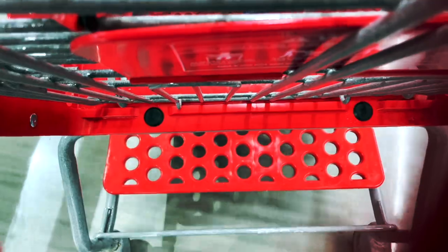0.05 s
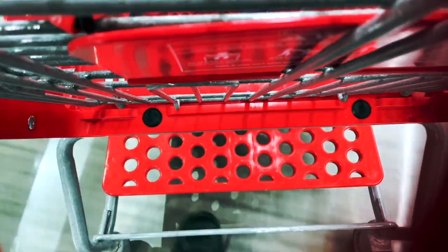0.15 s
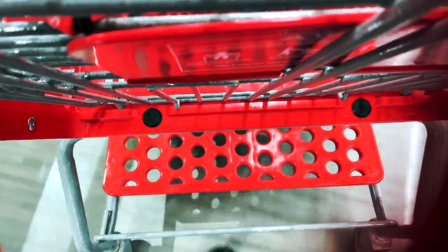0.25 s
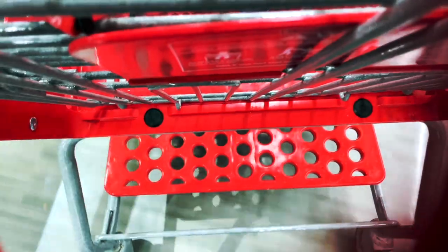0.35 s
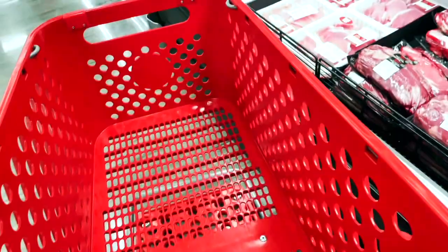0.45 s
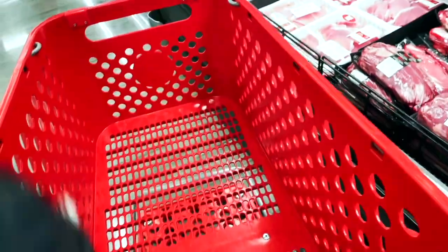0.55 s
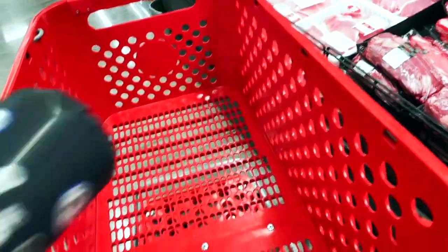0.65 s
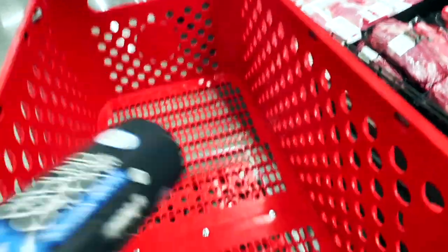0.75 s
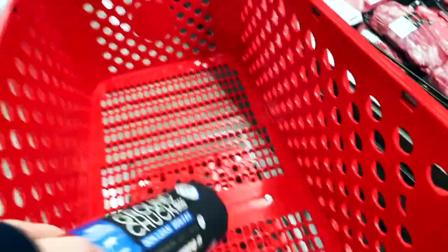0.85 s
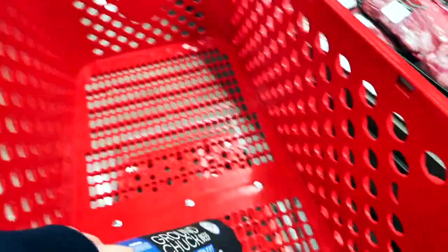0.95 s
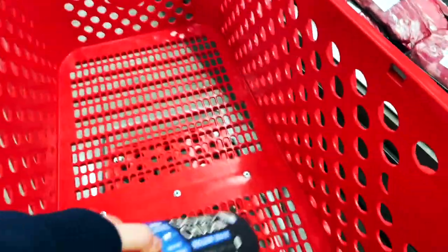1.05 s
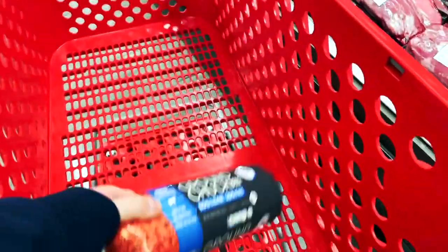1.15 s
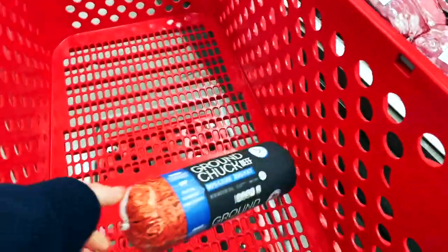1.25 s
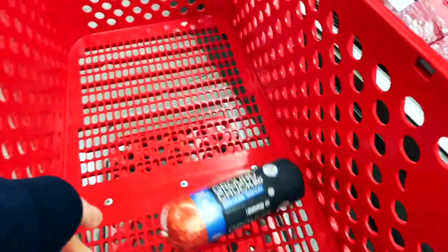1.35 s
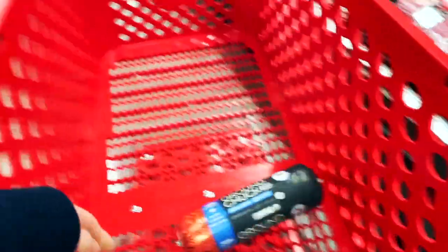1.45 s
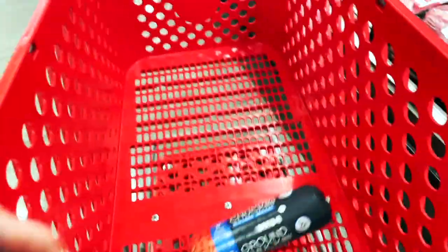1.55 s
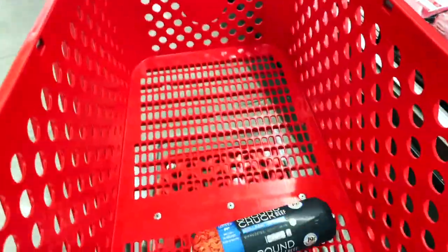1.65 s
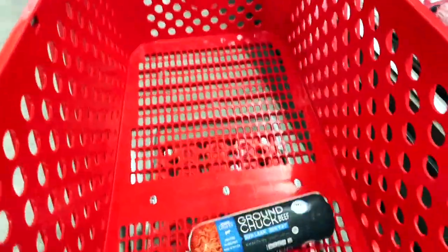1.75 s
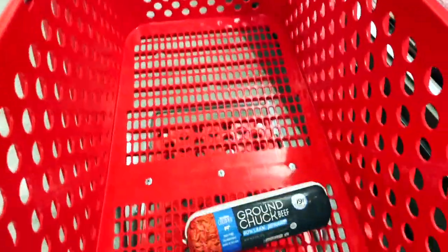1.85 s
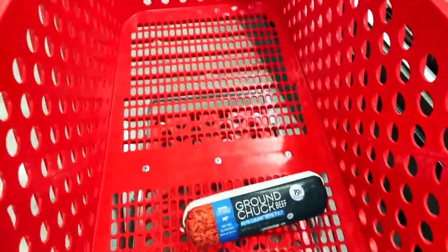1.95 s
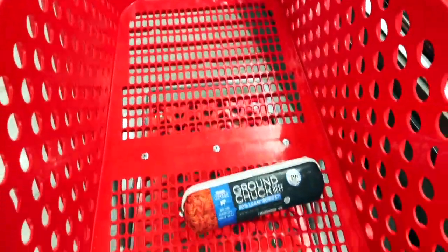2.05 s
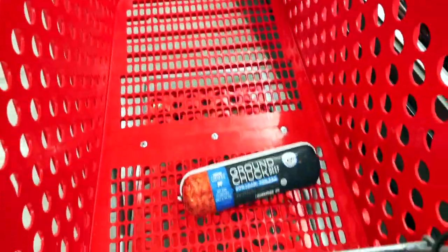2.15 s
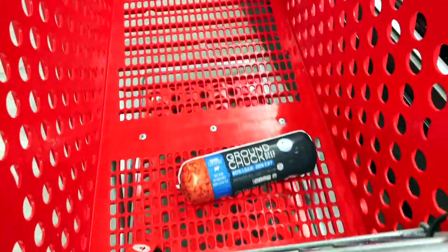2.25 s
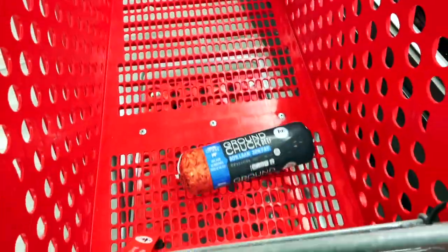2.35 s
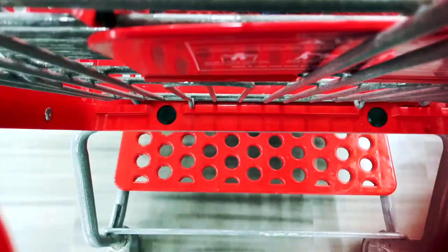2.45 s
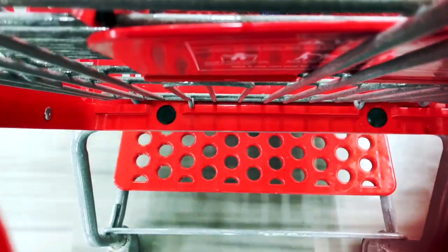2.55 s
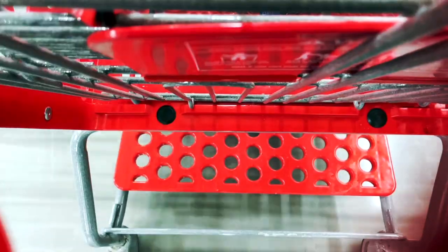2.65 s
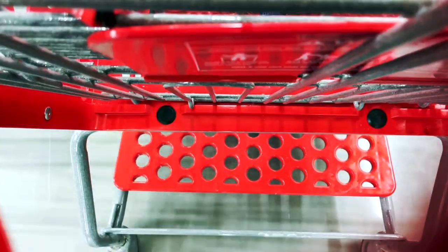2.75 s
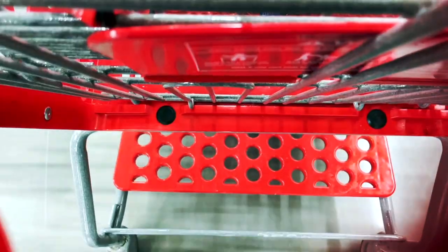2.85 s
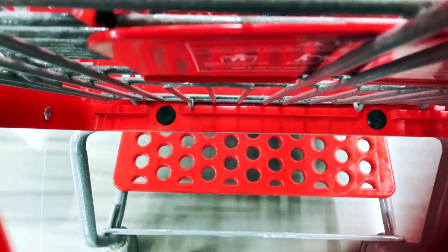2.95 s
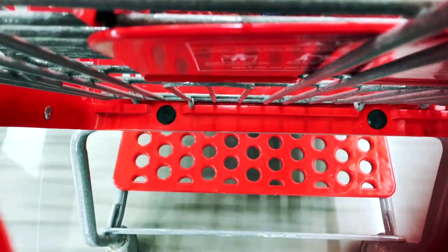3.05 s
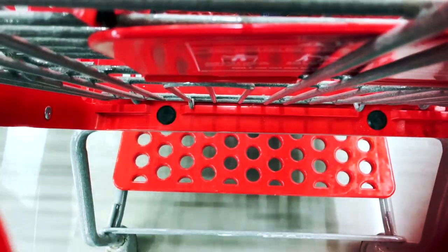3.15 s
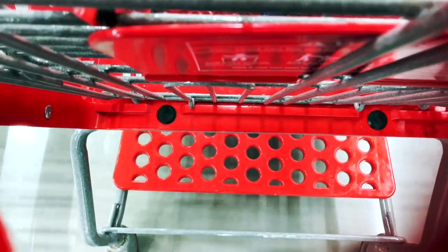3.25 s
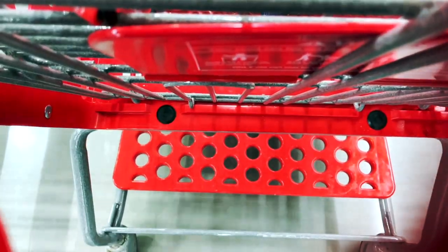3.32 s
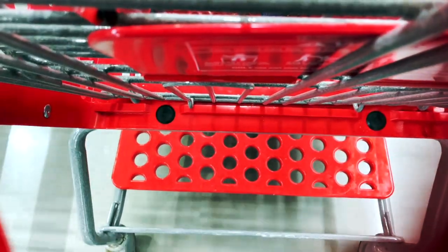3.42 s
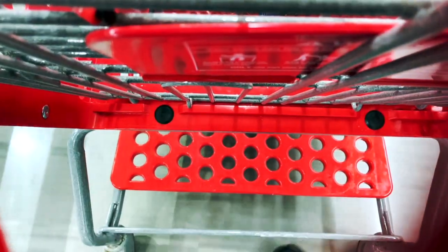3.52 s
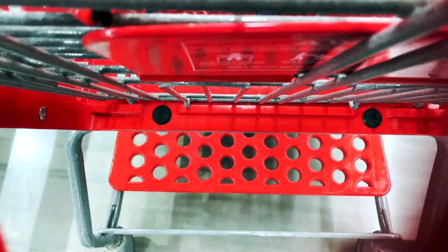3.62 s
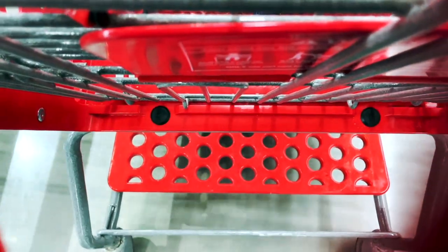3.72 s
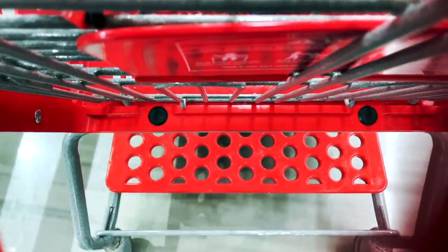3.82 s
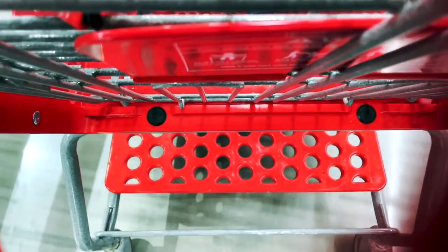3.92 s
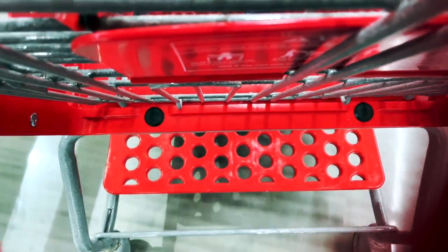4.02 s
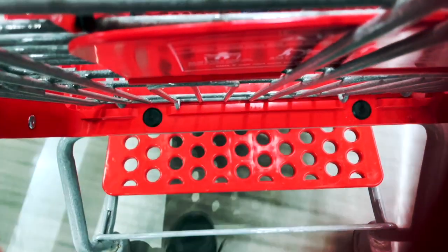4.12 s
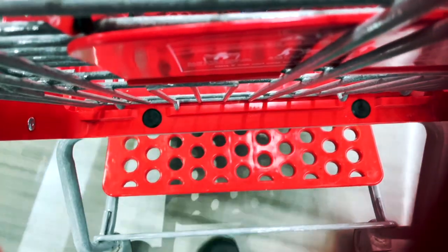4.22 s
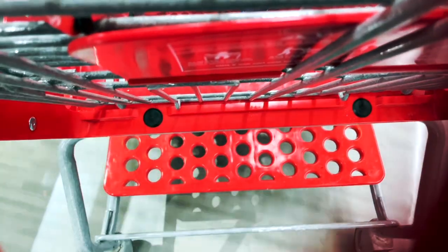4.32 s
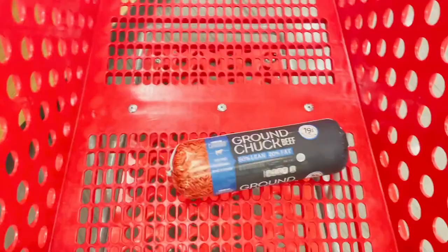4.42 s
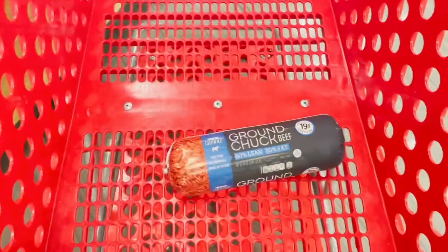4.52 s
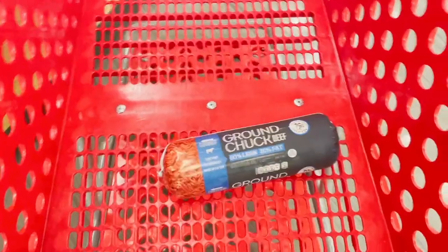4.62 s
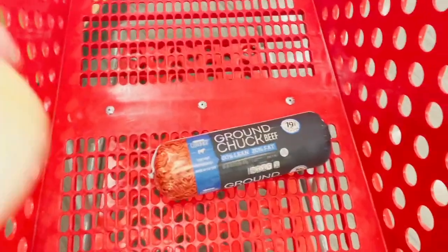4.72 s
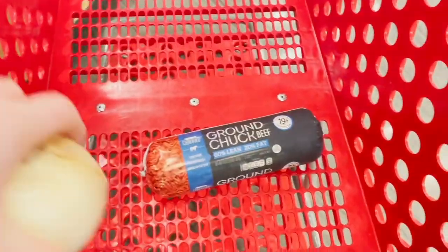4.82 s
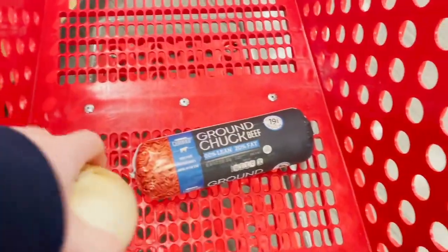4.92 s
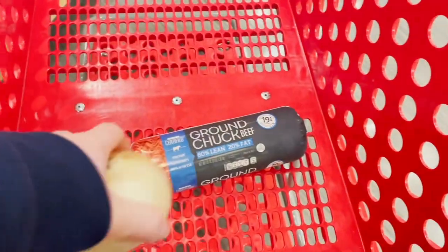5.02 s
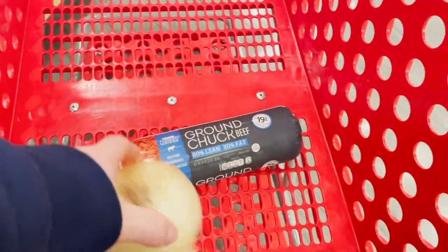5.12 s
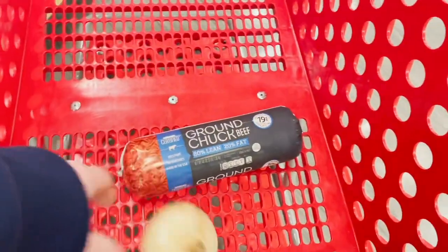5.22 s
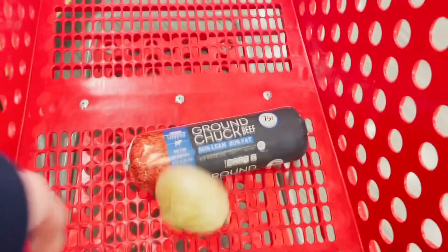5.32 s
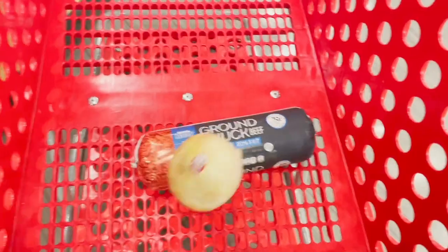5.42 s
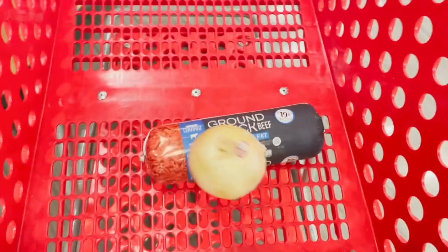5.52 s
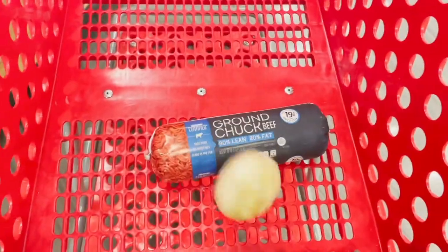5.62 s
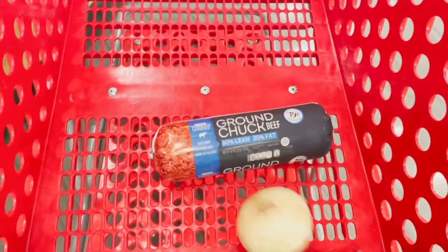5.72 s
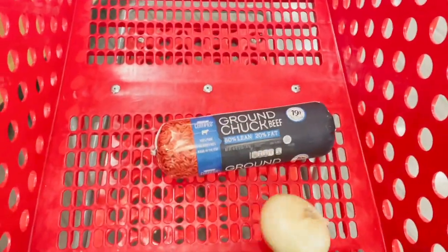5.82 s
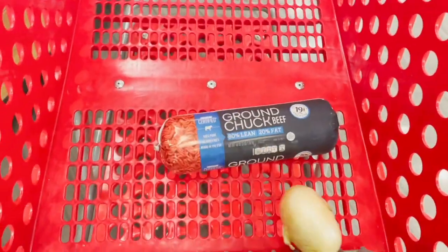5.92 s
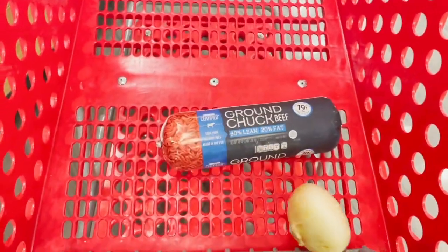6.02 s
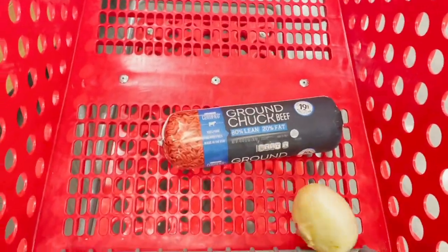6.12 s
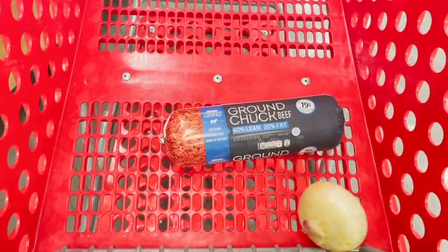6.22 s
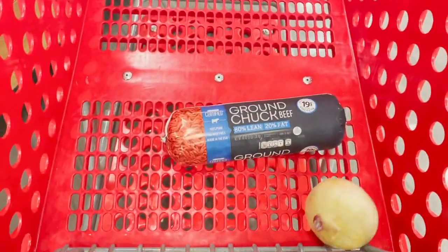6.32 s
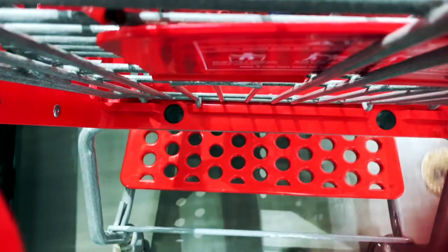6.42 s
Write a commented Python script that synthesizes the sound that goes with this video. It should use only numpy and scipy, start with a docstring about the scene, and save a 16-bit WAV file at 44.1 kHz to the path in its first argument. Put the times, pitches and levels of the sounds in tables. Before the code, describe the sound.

Close stereo sound in a large supermarket: low rolling rumble and bumps, a hard cut to steady refrigerator hum and fan roar, then a soft heavy packet smacks a ribbed plastic basket, rattling to rest with crisp wrapper pops. Another hard cut brings back longer wheel rumble, frame thumps, scrapes and metallic caster clacks. The last cut opens a quieter ventilated aisle, with dry skin rustles and an onion knocking, bouncing and settling.

```python
"""Wheels of a shopping cart rumble on a supermarket's hard floor for half a second: the end of the push heard later.
A cut leads to a humming meat cooler, where a roll of meat drops into the plastic basket on its steel frame; then comes
the whole push, and a quieter aisle where an onion drops in and bounces. Shaped noise makes floor, fans and air,
wavering sines make machines; contacts stir the resonances of basket and frame, and the store answers faintly."""
import sys
import numpy as np
from scipy import signal
from scipy.fft import rfft, irfft, next_fast_len
from scipy.io import wavfile
from scipy.ndimage import uniform_filter1d, map_coordinates

SR = 44100
rng = np.random.default_rng(int(sys.argv[2]) if len(sys.argv) > 2 else 0)


def transcribe(signal):
    """Save signal, clipped to [-1, 1], as a 16-bit WAV file at the path in sys.argv[1]."""
    frames = np.atleast_2d(signal).T
    limited = np.clip(frames, -1, 1)
    pcm = np.round(limited * 32767).astype(np.int16)
    wavfile.write(sys.argv[1], SR, pcm)


N = 285529

# Rolling wheels, colour of the rumble. Each row: frequency in Hz, level in dB per Hz.
RUMBLE_COLOUR = [(20, -28), (32, -23), (46, -2), (60, -9), (110, 0), (180, -4.5), (300, -11), (500, -17.5),
                 (800, -25), (1500, -38), (3000, -45), (8000, -50.5)]
# Treads hissing on the tiles. Each row: frequency in Hz, level in dB per Hz.
TREAD_COLOUR = [(400, 17), (1200, 12), (2500, 7), (3600, 2.5), (4800, 6), (5800, 0.5), (7200, -1.5),
                (10000, 3), (13000, 3.5), (16000, -6)]
# Wheel chatter. Each row: multiple of the chatter rate, relative level in dB.
CHATTER_PARTIALS = [(3, -13), (4, -15), (6, -33)]
# Steel frame under the rumble. Each row: resonance in Hz, width in Hz, level in dB over the rumble.
FRAME_MODES = [(46, 5.1, -9), (306, 28, -12.5), (392, 16, -12), (1075, 64, -8)]
# How hard the wheels rumble. Each row: time in seconds, level in dB.
RUMBLE_LEVEL = [(2.55, -15.5), (2.75, -16), (3.23, -13.5), (3.275, -15), (3.33, -14.5), (3.43, -12.5),
                (3.5, -13.5), (3.85, -14), (4.16, -14), (4.2, -19), (4.235, -18), (4.265, -16),
                (4.375, -14.5), (4.42, -17), (4.45, -15.5), (4.49, -14.5)]
# How loud the treads hiss. Each row: time in seconds, level in dB.
TREAD_HISS_LEVEL = [(2.55, -32.5), (2.7, -33.5), (3.5, -32), (3.85, -31), (4.37, -35.5)]
# Refrigeration passed on the way. Each row: line in Hz, level in dB when nearest, time nearest in seconds,
# seconds to fall by 3 dB.
PASSING_MACHINES = [(124.7, -27, 2.9, 2), (200.9, -21, 2.5, 2.5), (241.6, -22.5, 3.88, 0.5),
                    (1062, -40, 3.55, 0.5)]
# A wheel meeting a bump. Each row: start in seconds, peak in dB, centre of the thump in Hz.
FLOOR_BUMPS = [(2.598, -11, 131), (2.631, -19, 109), (2.936, -14, 118), (3.053, -13, 129),
               (3.145, -14.5, 340), (3.578, -24, 750), (3.793, -14.5, 434), (3.818, -19, 304),
               (4.038, -19.5, 370), (4.254, -12, 120), (4.358, -9.5, 108), (4.484, -15, 286)]
# Ring of the thumped frame. Each row: frequency in Hz, 60 dB decay in seconds.
FRAME_RING_MODES = [(76, 0.12), (118, 0.03), (205, 0.099), (304, 0.076), (390, 0.079), (445, 0.06),
                    (525, 0.094), (760, 0.11), (1000, 0.026)]
# A caster knocking in its swivel. Each row: start in seconds, ring in dB, main ring in Hz, 60 dB decay in seconds,
# frame thump in dB, crack in dB.
CASTER_KNOCKS = [(3.471, -23, 1840, 0.022, -17, -46), (4.137, -10.5, 2080, 0.015, -11, -31.5),
                 (4.1768, -5.5, 1824, 0.024, -30, -37), (4.1848, -15.5, 1810, 0.02, -29, -44)]
# Caster modes. Each row: ratio to the main ring, level in dB.
CASTER_MODES = [(.69, -6), (.9, -22.5), (0.979, -0.5), (1.13, -10), (1.22, -24), (1.4, -12), (2.8, -37)]
# A wheel scraping. Each row: centre in seconds, grit level in dB, half length in seconds.
WHEEL_SCRAPES = [(2.56, -29, 0.019), (3.117, -32, 0.021), (3.172, -30, 0.026), (3.809, -29.5, 0.035),
                 (4.392, -32, 0.03)]
# Colour of the grit. Each row: frequency in Hz, level in dB per Hz.
GRIT_COLOUR = [(700, -7), (1800, 5), (3000, 7.5), (4200, 7.5), (5600, 3.5), (7000, 5), (10000, -7),
               (16000, -16)]
# The tread squeaking as it slips. Each row: centre in seconds, level in dB, half length in seconds, pitch in Hz.
TREAD_SQUEAKS = [(2.5445, -20.5, .0016, 3250), (2.5587, -23, 0.0029, 2330), (2.559, -23, .0016, 4060),
                 (2.5595, -26, .003, 3360), (2.5624, -23, 0.0022, 4310), (2.5665, -22.5, .002, 3370),
                 (3.106, -29, 0.0027, 2760), (3.11, -32, .002, 3700), (3.12, -33, 0.0033, 2730),
                 (3.15, -26, .002, 3300), (3.151, -27, .002, 4200), (3.156, -31, .002, 2880),
                 (3.161, -29, .004, 4200), (3.176, -26, .002, 4270), (3.177, -32, .002, 3300),
                 (3.746, -31.5, .004, 4100), (3.786, -39, 0.0066, 3840), (4.33, -39, 0.0066, 3930),
                 (4.374, -31, .004, 3830), (4.405, -34, 0.0046, 4100), (4.415, -27.5, 0.0019, 4000)]
# Cooler's compressor and fan lines. Each row: frequency in Hz, relative level in dB.
COOLER_LINES = [(121, -45.5), (199.4, -27.5), (238, -40), (376.8, -44), (500.6, -51.5), (888, -62.5),
                (1007, -72), (1061, -56.5), (2218, -60.5), (2315, -62), (4360, -70), (5270, -74),
                (5975, -72)]
# The cooler's hum, fading and returning. Each row: time in seconds, level in dB.
COOLER_HUM_LEVEL = [(.52, -29.5), (1.15, -25.5), (1.42, -31), (1.55, -44), (2.05, -28), (2.52, -26)]
# Cooler fans' roar. Each row: frequency in Hz, level in dB per Hz.
FAN_COLOUR = [(15, -58), (25, -18.5), (114, -2.5), (157, -8.5), (201, -12), (278, -10.5), (429, -16),
              (798, -28), (894, -27.5), (1550, -38), (2190, -37), (6000, -55.5), (7800, -52), (13200, -120)]
# The microphones' own hiss. Each row: frequency in Hz, level in dB per Hz.
MIC_HISS = [(2500, -3.5), (5000, 0), (7000, 2.5), (10000, -2.5), (13000, 5), (16000, -5.5)]
# Dry onion skin and wrapping ticking. Each row: start in seconds, level in dB, brightness in dB,
# 60 dB decay in seconds.
SKIN_TICKS = [(1.199, -38.5, -11, 0.079), (4.572, -46, -10, 0.019), (4.769, -52, 7, 0.0084),
              (5.023, -61, 13, .015), (5.084, -51.5, 10, 0.12), (5.098, -44, 15.5, 0.007),
              (5.121, -57, 7, .015), (5.269, -32, 5, 0.094), (5.291, -27, -4, 0.12),
              (5.885, -45.5, 17, 0.047), (5.968, -45, 8, 0.014), (5.99, -45, 8, 0.06),
              (6.063, -49, 3.5, 0.063), (6.185, -49, 6, 0.024), (6.226, -57, 17, 0.012)]
# The store's reverberation. Each row: frequency in Hz, 60 dB decay in seconds.
STORE_DECAY = [(200, 0.61), (2000, 0.55), (10000, 0.2)]
# Meat sliding and rocking after contact. Each row: start in seconds, hold in seconds, rib rattle in dB,
# wrapper crinkle in dB.
MEAT_SLIDES = [(1.4, 0.0047, -24, -21), (1.441, 0.034, -23.5, -27), (1.6, 0.012, -32, -60),
               (1.662, 0.016, -43, -62)]
# The wrapper's crinkle. Each row: frequency in Hz, level in dB per Hz.
WRAPPER_COLOUR = [(2000, -33), (3800, -1), (4900, -10), (5800, -3), (7000, -4.5), (10000, -5),
                  (13000, -4.5), (16000, -16)]
# Brief ring of a crease. Each row: frequency in Hz, width in Hz, level in dB.
CREASE_MODES = [(4550, 260, -2), (6600, 250, -1)]
# Groceries striking the basket, meat then onion. Each row: start in seconds, ring in dB, hardness as dB of extra
# treble, bending wave peak in dB, bending wave centre in Hz.
BASKET_BLOWS = [(1.4035, -20.5, 1, -10, 1500), (1.414, -20.5, -4, -19, 500),
                (1.423, -14.5, 0.5, -3.5, 1590), (1.4335, -28, 4, -4.5, 1940),
                (1.443, -27.5, 12, -14, 1500), (1.46, -27, 10, -22, 2500), (1.467, -27, 3, -15.5, 400),
                (1.4805, -26, 7, -11, 1900), (1.49, -26.5, 13, -15, 1400), (1.518, -22, 1.5, -13, 1600),
                (1.579, -27, 1.5, -25, 2000), (1.604, -28, -1, -18, 1400), (1.613, -26, 3, -10, 1190),
                (1.623, -28.5, -7.5, -14, 1610), (1.63, -32, -1, -15, 1500), (1.6626, -32, 0, -18, 1400),
                (1.674, -29.5, -2, -17, 1300), (1.695, -39, -7, -28, 2000), (1.709, -38, -7, -23, 1200),
                (1.783, -38, -1, -28, 1500), (1.791, -38, -4, -24, 1000), (1.802, -39, -1, -26, 1190),
                (1.83, -36.5, -2, -28.5, 1400), (5.276, -18.5, 8.5, -6.5, 2600),
                (5.289, -23.5, -2, -13.5, 490), (5.3, -25.5, -1, -7, 1050), (5.306, -18, 2.5, -8, 1750),
                (5.312, -36, -5, -13.5, 480), (5.343, -32.5, -4, -20, 2200), (5.362, -36, -5, -19, 1300),
                (5.374, -41, -3, -28, 2000), (5.689, -21.5, 0, -17, 2000), (5.7, -30, -9.5, -15, 1200),
                (5.748, -35.5, -2, -30, 2200), (5.7926, -19, 6.5, -5, 2500), (5.832, -23, 5.5, -9.5, 2610),
                (5.888, -31, 3, -19.5, 3200), (5.967, -42, 6, -28, 3800)]
# Plastic basket. Each row: resonance in Hz, width in Hz, dB where the meat lands, dB where the onion lands.
BASKET_MODES = [(200, 25, -7, -9), (252, 25, -4, -4), (306, 25, -9, -8), (353, 25, -9, -15),
                (400, 30, -9, -10), (437, 22, 7, -6), (495, 34, -14, 5), (535, 25, -3, -2),
                (825, 40, -8, -5), (882, 28, -9, -4), (950, 20, -1, -6), (1050, 25, -9, -1),
                (1106, 38, -7, 3), (1200, 20, 3, -6), (1298, 25, -6, -2), (1421, 18, -4, -11),
                (1544, 22, 3, -3), (1785, 38, -5, 5), (1885, 26, 4, -2), (1960, 24, 3, 1),
                (2041, 22, 0, -10), (2242, 30, -11, -5), (2648, 32, 0, 2), (2850, 90, -13, -10),
                (3230, 60, -13, -10), (3950, 110, -10, -7), (4535, 30, 2, -5), (4870, 260, 0, -8),
                (6702, 35, -2, -3), (6950, 200, -3, -5)]
# Broad colour of the plastic. Each row: frequency in Hz, level in dB.
PLASTIC_COLOUR = [(60, -13), (150, -2.5), (480, -12.5), (640, -16), (850, -0.5), (2000, 2.5), (3500, -1),
                  (7000, -12), (10000, -3.5), (13000, 1), (16000, -17)]
# Decay of the plastic. Each row: frequency in Hz, 60 dB decay in seconds.
PLASTIC_DECAY = [(150, 0.1), (1000, 0.16), (3000, 0.13), (12000, 0.2)]
# Creases popping as the wrapper is squashed. Each row: start in seconds, level in dB, pitch in Hz.
WRAPPER_POPS = [(1.406, -22, 6900), (1.4345, -20, 4700), (1.4435, -12, 4650), (1.4485, -15, 4850),
                (1.461, -11, 4950), (1.4675, -15, 6950), (1.48, -15, 5000), (1.484, -18, 6900),
                (1.492, -20, 4740)]
# Air of the quiet aisle. Each row: frequency in Hz, level in dB per Hz.
AISLE_COLOUR = [(15, -45), (25, -19), (64, -1), (86, -4), (140, -5.5), (172, -9.5), (271, -11),
                (429, -18.5), (471, -16.5), (798, -22), (1120, -30), (1210, -30.5), (6000, -47),
                (7800, -68), (13200, -120)]
# Stereo width of distant sounds. Each row: frequency in Hz, side against mid in dB.
FAR_SIDE = [(40, -20), (120, -17), (300, -11), (600, -1.5), (1000, -1), (2000, -3.5), (5000, -4.5),
            (9000, 3.5), (11000, -1), (13000, -42)]
# Stereo width of sounds close to the microphones. Each row: frequency in Hz, side against mid in dB.
NEAR_SIDE = [(100, -6), (500, -14), (1000, -9), (2000, -6), (5000, -3), (9000, 1.5), (11000, -1),
             (13000, -22)]
# Response common to both microphone ports. Each row: frequency in Hz, level in dB.
PORT_RESPONSE = [(6000, -1.5), (7100, -0.5), (7900, -6), (8600, -26.5), (9300, -15.5), (10200, -2),
                 (11000, -0.5)]

TO_COOLER_S, TO_PUSH_S, TO_AISLE_S = .5, 2.542, 4.504  # the cuts
TOP_HZ = 16000  # band limit of the microphones' signal
HUM_WAVER_DB = 2.2  # slow unsteadiness of each machine line
ROAR_DB, ROAR_FOLLOWS = -25, 0.2  # cooler fans; dB of roar per dB of hum
THUMP_OCTAVES, THUMP_RISE_S = 0.47, 0.0021  # half width of a thump's spectrum
GRIT_RATE, RIB_RATE, CREASE_RATE = 3000, 500, 700  # contacts per second: tread grit, ribs, wrapper
SQUEAK_CLIMB_PER_S, SQUEAK_ROUGH = 4.2, 0.47  # share the pitch climbs in a second; unsteadiness
TICK_RISE = 0.034  # rise over 60 dB decay: long rustles swell softly
# Travel of a 1 kHz bending wave: from the meat, from the onion, up the frame from a caster
MEAT_LAG_S, ONION_LAG_S, FRAME_LAG_S = 0.003015, 0.0091, 0.000864
WAVE_SCATTER_S, WAVE_OCTAVES = 0.029, 0.8  # 60 dB decay over the grid's many paths; half width of spectrum
SLIDE_ATTACK_S, SLIDE_FADE_DB_PER_S = 0.011, 221
BUZZ_ROUGH_DB, SLIDE_ROUGH_DB = 3.3, 2  # unevenness of panel buzz and of sliding contacts
THUD_DB, CLACK_DB, SNAP_DB, FIZZ_DB = -2, -5.5, -12, -28  # four bands of a blow, low to high
THUD_LOSS = 0.86  # dB less thud per dB of hardness
CONTACT_S, CONTACT_SHORTENS = 0.0021, 0.11  # rise time of a blow; dB shorter per dB of hardness
CRACK_DB, CRACK_GROWS = -9, 0.21  # first crack against the buzz; dB more per dB of hardness
SPOT_DB, SPOT_DETUNE = 2.5, .003  # spread of each mode between contacts: level, share of pitch
MEAT_LANDS_S, ONION_LANDS_S, SETTLE_S = 1.4, 5.27, .15  # contacts this much later find a loaded basket
DAMP_DB, DAMP_WIDENS = 4.5, 1.3  # a load on the plastic: dB weaker, times as wide
POP_RISE_S, POP_T60_S = 0.0008, 0.023


def amp(db):
    """Decibels to gain."""
    return 10 ** (np.asarray(db) / 20)


def unit(x):
    """Scaled to rms 1."""
    return x / np.sqrt(np.mean(x ** 2) + 1e-20)


def along(points, hz):
    """(Hz, value) points read on a log axis."""
    f, v = np.transpose(points)
    return np.interp(np.log(hz + 1), np.log(f + 1), v)


def curves(rows):
    """One value per sample for each column after the time."""
    s, *cols = np.transpose(rows)
    return [np.interp(np.arange(N) / SR, s, c) for c in cols]


def wobble(rate):
    """A smooth random curve, rate knots a second."""
    knots = rng.standard_normal(int(N * rate / SR) + 4)
    return map_coordinates(knots, [np.arange(N) * rate / SR])


def filtered(x, response):
    """x passed through a complex response of frequency."""
    n = x.shape[-1]
    m = next_fast_len(n + 8192)
    return irfft(rfft(x, m) * response(np.fft.rfftfreq(m, 1 / SR)), m)[..., :n]


def resonances(modes, hz):
    """Summed response of (Hz, width, dB) resonances."""
    return sum(amp(db) * 1j * hz * w / (c * c - hz * hz + 1j * hz * w) for c, w, db in modes)


def spread(pair, width):
    """The first signal becomes mid; the second, weighted by frequency, becomes side."""
    return np.array([pair[0], filtered(pair[1], lambda hz: amp(along(width, hz)))])


def rush(spectrum, modes=()):
    """Mid and side noise of a given colour, the mid near rms 1, as wide as a distant source."""
    colour = lambda hz: amp(along(spectrum, hz)) * (1 + resonances(modes, hz))
    return spread(unit(filtered(rng.standard_normal((2, N)), colour)), FAR_SIDE)


def dying(decay, size):
    """Two noises in which each frequency dies at its own speed."""
    hz, t, z = signal.stft(rng.standard_normal((2, size)), SR, nperseg=128)
    fade = amp(-60 * t / along(decay, hz)[:, None])
    return signal.istft(z * fade, SR, nperseg=128)[1][:, :size]


def band(x, lo_hz, hi_hz):
    """One causal band of a hit, at rms 1 over its first 20 ms."""
    edges = [lo_hz, min(hi_hz, SR / 2 - 1000)]
    part = signal.sosfilt(signal.butter(3, edges, "band", fs=SR, output="sos"), x)
    return part / np.sqrt(np.mean(part[:, :SR // 50] ** 2, axis=1, keepdims=True))


def crackle(rate, rough_db):
    """Separate little contacts of uneven size, rate a second on average, as two signals."""
    contacts = rng.random(N) < rate / SR
    return contacts * amp(rough_db * wobble(400)) * np.sign(rng.standard_normal((2, N)))


def bending(lag_s, hz):
    """Bending waves disperse: treble arrives first, delay grows as one over the root of frequency."""
    return np.exp(-2j * np.pi * lag_s * (2 * np.sqrt(1000 * hz) - hz * np.sqrt(1000 / TOP_HZ)))


def add(track, s, sound):
    """Mix a sound in at time s."""
    room = track[:, round(s * SR):][:, :sound.shape[-1]]
    room += sound[..., :room.shape[-1]]


def wheels():
    """Floor grain and tread chatter shake the frame; the treads hiss on the tiles."""
    rumble_db, = curves(RUMBLE_LEVEL)
    hiss_db, = curves(TREAD_HISS_LEVEL)
    chatter_hz = 25.2 * (1 + 0.01173 * wobble(6))
    turn = 2 * np.pi * np.cumsum(chatter_hz) / SR
    chatter = sum(amp(db + 1.5 * wobble(15)) * np.sin(k * turn + 1.77 * wobble(14))
                  for k, db in CHATTER_PARTIALS)
    bumps = wobble(21.69)  # unevenness of the floor, felt by rumble and hiss
    rumble = amp(-2.0 + 0.73 * bumps) * rush(RUMBLE_COLOUR, FRAME_MODES)
    shake = rumble + amp(-8) * unit(chatter) * amp([[0], [-24]])  # chatter is almost all mid
    return amp(rumble_db) * shake + amp(hiss_db + 1.5 * bumps + 1.05 * wobble(90)) * rush(TREAD_COLOUR)


def hum(lines):
    """Sines of rotating machines, slightly unsteady in level and phase, as mid and side."""
    t = np.arange(N) / SR

    def tone(hz):
        drift = 0.4 * np.array([wobble(14), wobble(14)])
        start = rng.uniform(0, 2 * np.pi) + np.array([[0], [np.pi / 2]])
        return np.sin(2 * np.pi * hz * t + drift + start)

    return spread(sum(amp(db + HUM_WAVER_DB * wobble(7.04)) * tone(hz) for hz, db in lines), FAR_SIDE)


def machines():
    """Each refrigeration unit grows louder and fades with distance as the cart goes by."""
    t = np.arange(N) / SR
    return hum([(hz, db - 10 * np.log10(1 + ((t - nearest) / half) ** 2))
                for hz, db, nearest, half in PASSING_MACHINES])


def thump(db, centre_hz):
    """The frame rings briefly, most in the modes near the centre of the blow."""
    t = np.arange(SR // 10) / SR
    ring = np.zeros(len(t))
    for hz, t60 in FRAME_RING_MODES:
        weight = np.exp(-.5 * (np.log2(hz / centre_hz) / THUMP_OCTAVES) ** 2)
        ring += weight * amp(-60 * t / t60) * np.sin(2 * np.pi * (hz * t + rng.random()))
    ring *= 1 - np.exp(-t / THUMP_RISE_S)
    return amp(db) * ring / np.abs(ring).max()


def jolts():
    """Single bumps in the floor thump the frame."""
    out = np.zeros((2, N))
    for s, db, hz in FLOOR_BUMPS:
        add(out, s, thump(db, hz) * amp([[0], [-14]]))
    return out


def caster():
    """A swivel knocks: a dry crack, a short metal ring and a thump, dispersed on the way up the frame."""
    out, t = np.zeros((2, N)), np.arange(SR // 10) / SR
    for s, db, hz, t60, thump_db, crack_db in CASTER_KNOCKS:
        ring = sum(amp(level) * np.sin(2 * np.pi * ratio * hz * t) for ratio, level in CASTER_MODES)
        ring = ring * amp(-60 * t / t60) * (1 - np.exp(-t / 0.00026))
        crack = band(rng.standard_normal((2, len(t))) * amp(-60 * t / .01), 1900, 4800)
        knock = amp(db) * ring + amp(crack_db) * crack + thump(thump_db, centre_hz=385)
        add(out, s, filtered(knock, lambda f: bending(FRAME_LAG_S, f)) * amp([[0], [-8]]))
    return out


def scrapes():
    """The tread sticks and slips: gritty swells with short squeaks that climb."""
    out, t = np.zeros((2, N)), np.arange(N) / SR
    grains = crackle(GRIT_RATE, rough_db=1.0)
    grit = spread(unit(filtered(grains, lambda hz: amp(along(GRIT_COLOUR, hz)))), FAR_SIDE)
    for s, db, half in WHEEL_SCRAPES:
        out += amp(db) * np.exp(-.5 * ((t - s) / half) ** 2) * grit
    rasp, waver = 1 + SQUEAK_ROUGH * wobble(500), 2 * SQUEAK_ROUGH * wobble(600)
    for s, db, half, hz in TREAD_SQUEAKS:
        near = np.abs(t - s) < 4 * half
        u = t[near] - s
        tone = np.sin(2 * np.pi * hz * (u + SQUEAK_CLIMB_PER_S * u ** 2 / 2) + waver[near])
        swell = np.exp(-.5 * (u / half) ** 2)
        out[:, near] += amp(db) * swell * rasp[near] * tone * amp([[0], [-8]])
    return out


def cooler():
    """Fans roar in a boomy cabinet under compressor lines; the roar sinks a little as the hum fades."""
    hum_db, = curves(COOLER_HUM_LEVEL)
    roar_db = ROAR_DB + ROAR_FOLLOWS * (hum_db - hum_db.mean())
    roar = amp(roar_db) * rush(FAN_COLOUR, [(125.4, 4.9, 3.0)])
    return roar + amp(hum_db) * unit(hum(COOLER_LINES)) + amp(-47.5) * rush(MIC_HISS)


def ticks():
    """Dry skin and wrapping crack in tiny spiky bursts."""
    out, t = np.zeros((2, N)), np.arange(SR // 8) / SR
    for s, db, bright_db, t60 in SKIN_TICKS:
        envelope = amp(-60 * t / t60) * (1 - np.exp(-t / (TICK_RISE * t60)))
        burst = rng.laplace(size=(2, len(t))) * envelope
        add(out, s, amp(db) * (band(burst, 3240, 6450) + amp(bright_db) * band(burst, 8350, 14500)))
    return spread(out, NEAR_SIDE)


def store(x):
    """The wide sales floor answers with a diffuse tail, 12.5 ms late, its treble dying first."""
    tail = dying(STORE_DECAY, SR // 2)
    late = np.pad(x[0], (SR // 80, 0))[None]
    answer = signal.fftconvolve(late, tail / np.linalg.norm(tail[0]), axes=1)[:, :N]
    return spread(answer, FAR_SIDE)


def spot(onion, damped):
    """Basket modes as one contact stirs them: set by its place, duller under a load, varied each time."""
    loss_db, widen = (DAMP_DB, DAMP_WIDENS) if damped else (0, 1)
    modes = []
    for hz, width, meat_db, onion_db in BASKET_MODES:
        pitch = hz * (1 + SPOT_DETUNE * rng.standard_normal())
        level_db = (onion_db if onion else meat_db) - loss_db + SPOT_DB * rng.standard_normal()
        modes.append((pitch, width * widen, level_db))
    return modes


def body(modes, hz):
    """The basket's response: a broad colour with many narrow modes."""
    return amp(along(PLASTIC_COLOUR, hz)) * (1 + 2 * resonances(modes, hz))


def slide():
    """Meat bumps over the ribs in dense little contacts, its wrapper crinkling; each slide holds, then dies."""
    t = np.arange(N) / SR
    modes = spot(onion=False, damped=True)
    path = lambda hz: bending(MEAT_LAG_S, hz)
    rib_response = lambda hz: body(modes, hz) * path(hz) / (1 + (hz / 3500) ** 4)
    film_response = lambda hz: amp(along(WRAPPER_COLOUR, hz)) * (1 + resonances(CREASE_MODES, hz)) * path(hz)
    ribs = unit(filtered(crackle(RIB_RATE, SLIDE_ROUGH_DB), rib_response))
    film = unit(filtered(crackle(CREASE_RATE, SLIDE_ROUGH_DB), film_response))
    out = np.zeros((2, N))
    for s, hold, rattle_db, crinkle_db in MEAT_SLIDES:
        fade = amp(-SLIDE_FADE_DB_PER_S * np.maximum(t - s - hold, 0))
        motion = np.clip((t - s) / SLIDE_ATTACK_S, 0, 1) * fade
        out += motion * (amp(rattle_db) * ribs + amp(crinkle_db) * film)
    return spread(out, NEAR_SIDE)


def snap(modes, lag_s, centre_hz, size):
    """A bending wave through the plastic, scattered by the ribs over many paths, at peak 1."""
    t = np.arange(size) / SR
    contact = lambda hz: np.exp(-.5 * (np.log2((hz + 1) / centre_hz) / WAVE_OCTAVES) ** 2)
    quarter_turn = np.array([[1], [1j]])  # side a quarter turn from mid
    response = lambda hz: contact(hz) * (1 + resonances(modes, hz)) * bending(lag_s, hz) * quarter_turn
    wave = filtered(rng.standard_normal(size) * amp(-60 * t / WAVE_SCATTER_S), response)
    return wave / np.abs(wave).max()


def chatter_and_ring(modes, hard_db, size):
    """The grid's ring after a blow; a harder blow is shorter, with more crack and treble and less thud."""
    t = np.arange(size) / SR
    # loose panels buzz against the frame in uneven bursts, 450 knots a second
    buzz = amp(BUZZ_ROUGH_DB * np.interp(t * 450, np.arange(size), rng.standard_normal(size)))
    crack = amp(CRACK_DB + CRACK_GROWS * hard_db - 60 * t / 0.018)
    rise = 1 - np.exp(-t / (CONTACT_S * amp(-CONTACT_SHORTENS * hard_db)))
    force = (buzz + crack) * rise
    ring = filtered(force * dying(PLASTIC_DECAY, size), lambda hz: body(modes, hz))
    thud = amp(THUD_DB - THUD_LOSS * hard_db) * band(ring, 210, 655)
    clack = amp(CLACK_DB) * band(ring, 950, 2520)
    high = amp(SNAP_DB) * band(ring, 2610, 8300) + amp(FIZZ_DB) * band(ring, 6800, 23000)
    return thud + clack + amp(hard_db) * high


def basket():
    """Each blow sends a scattered bending wave through the plastic, while the grid chatters and rings."""
    out, size = np.zeros((2, N)), SR // 4
    for s, db, hard_db, wave_db, wave_hz in BASKET_BLOWS:
        onion = s > TO_AISLE_S
        lag_s, landed = (ONION_LAG_S, ONION_LANDS_S) if onion else (MEAT_LAG_S, MEAT_LANDS_S)
        modes = spot(onion, damped=s > landed + SETTLE_S)
        ring = amp(db) * chatter_and_ring(modes, hard_db, size)
        add(out, s, ring + amp(wave_db) * snap(modes, lag_s, wave_hz, size))
    return spread(out, NEAR_SIDE)


def pops():
    """Creases of the taut wrapper snap over one by one, each with a short high ring."""
    out, t = np.zeros((2, N)), np.arange(SR // 20) / SR
    for s, db, hz in WRAPPER_POPS:
        phase = 2 * np.pi * (hz * t + rng.random((2, 1))) + .6 * wobble(810)[:len(t)]
        envelope = amp(db - 60 * t / POP_T60_S) * (1 - np.exp(-t / POP_RISE_S))
        add(out, s, envelope * np.sin(phase))
    return spread(out, NEAR_SIDE)


def aisle():
    """Ventilation rumbles in the quiet aisle as coloured noise, over the microphones' hiss."""
    air = amp(-29.5 + 0.15 * wobble(3.5)) * rush(AISLE_COLOUR, [(125.8, 15.0, -1.0)])
    return air + amp(-51.5) * rush(MIC_HISS)


def scene():
    """The end of the push, then cooler, push and quiet aisle, cut hard; groceries and store lie on top."""
    a, b, c = [round(s * SR) for s in (TO_COOLER_S, TO_PUSH_S, TO_AISLE_S)]

    def during(start, end):
        inside = 1. * (np.arange(N) >= start) * (np.arange(N) < end)
        return uniform_filter1d(inside, size=64)  # softens each cut over 64 samples

    push = wheels() + machines() + jolts() + caster() + scrapes()
    opening = during(0, a) * np.roll(push, a - c, axis=1)
    places = opening + during(a, b) * cooler() + during(b, c) * push + during(c, N) * aisle()
    groceries = ticks() + slide() + basket() + pops()
    mid, side = places + groceries + amp(-18.5) * store(groceries)
    return np.array([mid + side, mid - side])


def record(dry):
    """The two ports cancel what they share in a narrow treble band; nothing is kept above the band limit."""
    mid = filtered((dry[0] + dry[1]) / 2, lambda hz: amp(along(PORT_RESPONSE, hz)))
    side = (dry[0] - dry[1]) / 2
    return filtered(np.array([mid + side, mid - side]), lambda hz: hz < TOP_HZ)


dry = scene()
out = record(dry)
transcribe(out)
```